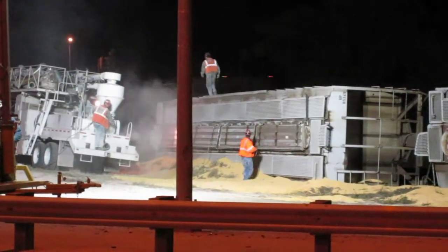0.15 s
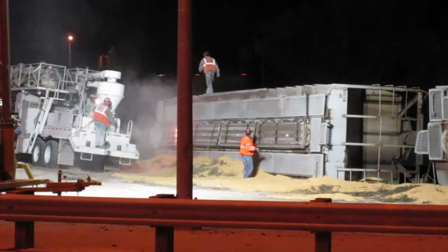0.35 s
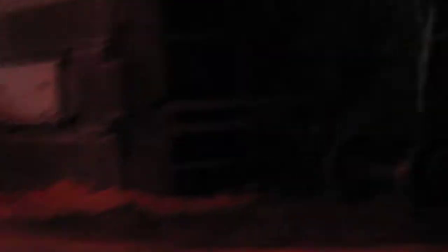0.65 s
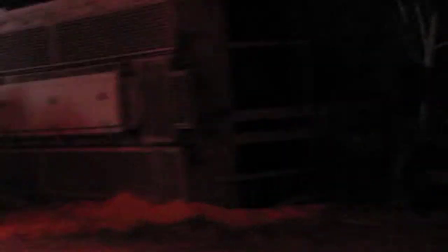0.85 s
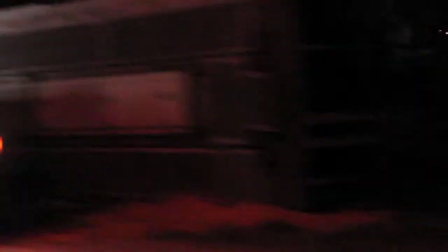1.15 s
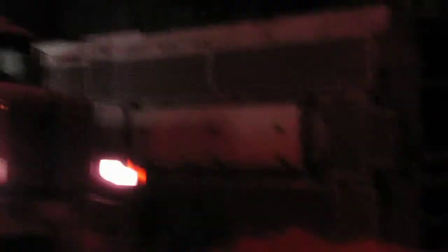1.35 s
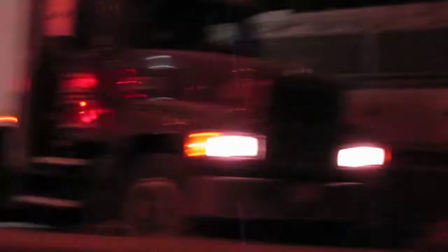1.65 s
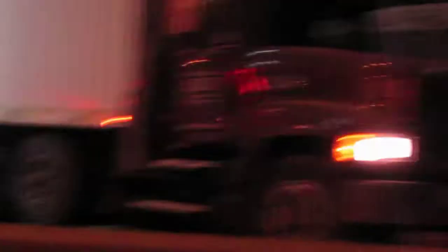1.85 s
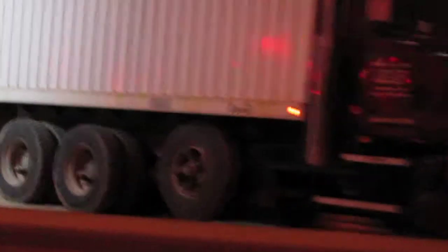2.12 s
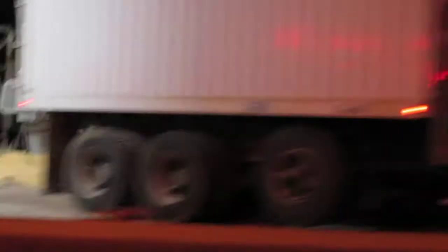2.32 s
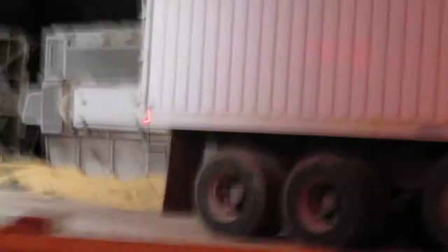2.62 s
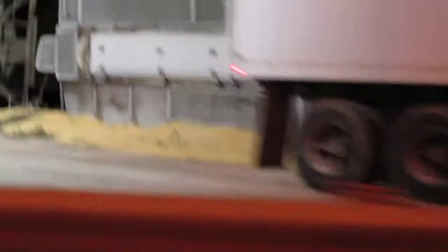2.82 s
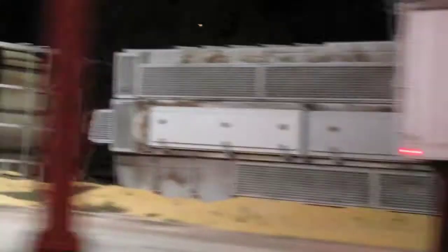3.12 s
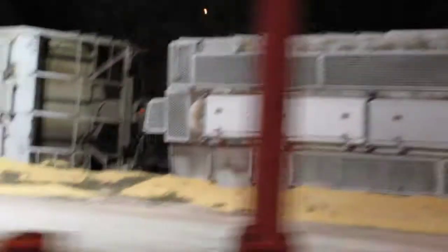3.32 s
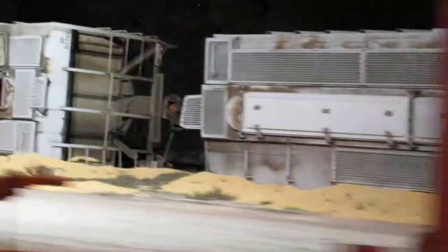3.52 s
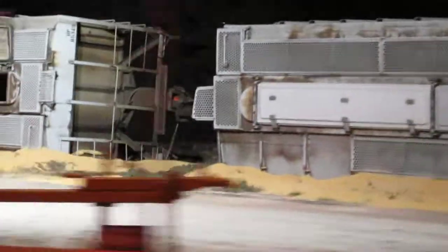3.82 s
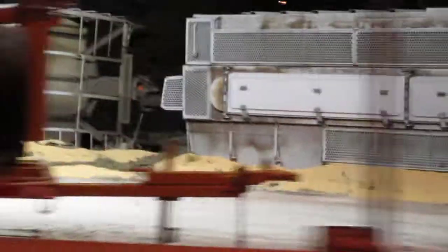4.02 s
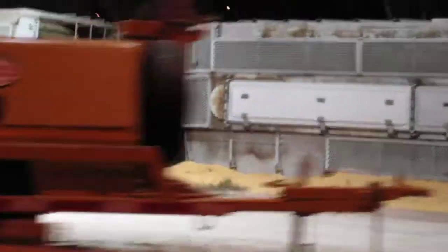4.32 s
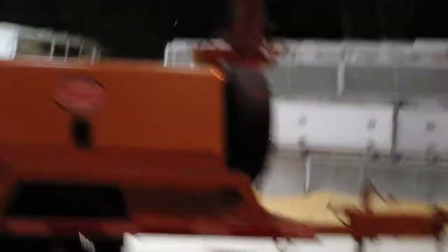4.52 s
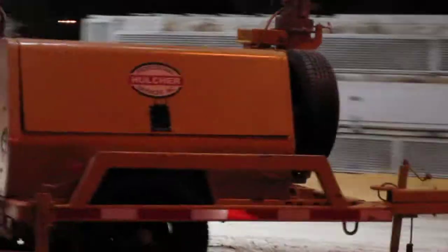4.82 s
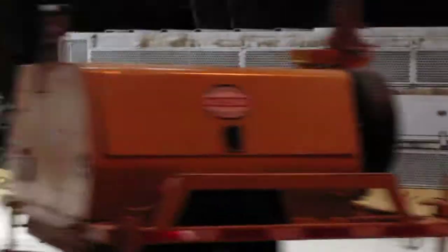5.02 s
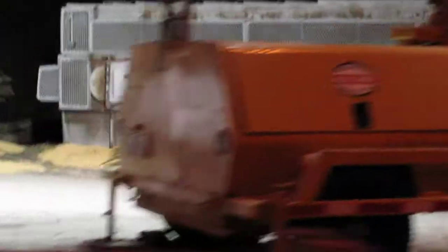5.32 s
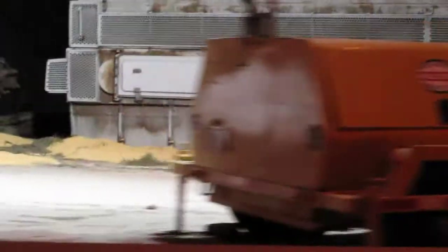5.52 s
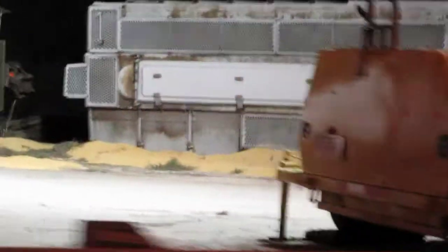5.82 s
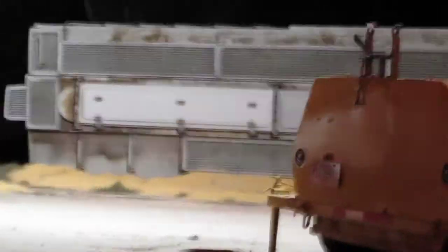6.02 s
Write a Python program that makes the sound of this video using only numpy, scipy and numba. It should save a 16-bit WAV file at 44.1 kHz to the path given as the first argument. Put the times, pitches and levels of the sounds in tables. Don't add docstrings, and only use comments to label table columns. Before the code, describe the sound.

Outdoors at night, a vacuum truck roars with bright rushing air and rapid diesel clatter. A short dead silence follows, then the sound resumes from inside a slowly rolling car: low cabin rumble, tiny grit ticks, two dull bumps and a swelling airy rush as a lorry passes. A very short air-valve blast spits, then a small diesel set rattles close, hard and metallic, with hiss pulsing to its beat.

```python
import sys
import numpy as np
from scipy import signal
from scipy.fft import rfft, irfft
from scipy.io import wavfile
from scipy.ndimage import uniform_filter1d, map_coordinates
from numba import njit

SR = 44100
rng = np.random.default_rng(int(sys.argv[2]) if len(sys.argv) > 2 else 0)


def int16_out(signal):
    q = np.round(np.clip(np.atleast_2d(signal).T, -1, 1) * 32767)
    wavfile.write(sys.argv[1], SR, q.astype(np.int16))


def boost_factor(decibels):
    exponent = np.asarray(decibels, float) / 20
    return 10 ** exponent


N = 271656
T = np.arange(N) / SR

CUT_S = (.3046, .4800)

# t/s, distance/m, block level/dB
DIESEL_PATH = [(.48, 18, -53), (1.5, 19.4, -49.5), (2.1, 16.3, -32), (2.5, 15.2, -26.5), (2.95, 12.65, -26),
               (3.4, 11.9, -21.5), (3.8, 10.8, -18), (4.05, 9.7, -17.5), (4.3, 10.76, -18.5),
               (5.2, 11, -19), (5.6, 11.4, -21), (6.16, 10.75, -22.5)]
# f/Hz, spectral level/dB per Hz
BLOCK_SPECTRUM = [(88, -32), (150, -2), (183, -52), (237, -19), (333, -8.5), (378, -13), (424, -9),
                  (510, -26.5), (596, -7.5), (839, -11), (914, 1.5), (996, -6), (1250, 1), (2620, -6.5),
                  (4500, -37), (5850, -81), (9900, -120)]
CYCLE_HZ, GEAR_TEETH = 14.78, 16
# place/cycle, block level/dB, cover level/dB, gas level/dB
STROKE = [(0, -8, -15, -5), (.06, 0, -2, 0), (.14, 1, 1, 0), (.25, -1.5, -4, 0), (.37, 0, -2, -1),
          (.5, -3, -8, -1.5), (.62, -3, -10, -.5), (.75, -5.5, -16, -2), (.86, -7, -18, -4),
          (.94, -9, -19, -6)]
# multiple of the cycle rate, level/dB
EXHAUST = [(1, -26), (2, -12), (3, -19), (4, 6), (5, -6), (6, -16), (7, 6), (8, -2.5), (9, 0), (10, -1.5),
           (11, -21), (12, -26), (13, -38.5), (14, -17), (15, 5.5), (16, -15), (17, 7.5), (18, -22.5)]
# multiple of the tooth rate, level/dB
GEAR_LINES = [(1, -6.5), (2, -4), (3, 0.5), (4, 5.5), (5, 0.5), (7, -3.5), (8, 0), (9, -1.5)]
# t/s, level/dB, rise/s, fall/s
SUMP = [(2.7, -26.5, 0.97, 0.42), (4.05, -24.5, 0.32, 0.34), (4.9, -28, 0.51, .3), (5.95, -29.5, 0.24, .6)]
COVER = [(.5, -39, .3, 0.98), (3.45, -25.5, 0.62, 0.53), (4.35, -33, 0.18, 0.12), (4.9, -29, .3, 0.36),
         (5.7, -35, .3, .5)]
GEAR_SWELLS = [(2, -28, .8, .6), (3.2, -28, 0.95, 0.66), (4.5, -27.5, 0.78, 1.3)]
# t/s, level/dB, rise/s, fall/s
ROCKER = (4.5, -36, 1, 1.1)
COVER_HZ, COVER_SAG_HZ_PER_S, ROCKER_HZ = 2713, 87, 3130

# f/Hz, spectral level/dB per Hz
RUSH_SPECTRUM = [(88, -15), (150, -7), (378, -9), (444, -6.5), (605, -5.5), (847, -3), (953, -3),
                 (1200, -4), (1520, -5), (2100, -7), (3040, -16.5), (3410, -13.5), (5000, -40.5),
                 (6500, -55), (11000, -120)]
AIR_DB, HOSE_HZ = -24.5, 996
# t/s, level/dB, rise/s, fall/s
LORRY = (1.5, -22.5, 1.13, 1.5)
# t/s, level/dB, rise/s, fall/s
HOSE = [(1.3, -21, 1.2, 1), (4.2, -27.5, 0.48, 0.69)]
WHINE = [(.9, -47, 0.18, .4), (3.0, -34, 1, 1.1), (4.6, -39.5, 0.34, 1.5)]
WHINE_HIGH_HZ, WHINE_LOW_HZ, WHINE_SAG_HZ_PER_S = 4400, 3382, 65
WHINE_DROPS_S, WHINE_DROP_LENGTH_S = 1.44, 0.27
# t/s, level/dB, rise/s, fall/s, f/Hz
HOLLOWS = [(1.9, -38.5, 0.65, 0.45, 3424), (2.5, -30.5, 0.47, 0.52, 2050), (3.2, -36.5, 0.58, 0.34, 3550),
           (5.8, -31, 0.3, .5, 1440)]

# f/Hz, spectral level/dB per Hz
STANDING_SPECTRUM = [(15, -62), (25, -13), (129, -15), (174, -9.5), (359, -14.5), (483, -19), (704, -6.5),
                     (897, -3.5), (1500, -10), (1960, -18), (2630, -18.5), (2860, -26), (4890, -32),
                     (11000, -35), (15600, -53)]
STANDING_DIESEL_DB, STANDING_AIR_DB = -24, -23

# t/s, level/dB
VALVE = [
    (2.53, -62),
    (2.538, -36),
    (2.562, -27),
    (2.566, -15),
    (2.5715, -16),
    (2.573, -70),
]
# f/Hz, spectral level/dB per Hz
VALVE_SPECTRUM = [(880, -32), (1500, -1.5), (2920, -2.5), (3450, -27), (3800, -11.5), (4230, -10),
                  (5250, -19.5), (6640, -12.5), (7330, -19), (8740, -10.5), (9730, -29), (12800, -29.5),
                  (15600, -38)]
# t/s, level/dB, rise/s, fall/s
SEEP = (2.4, -48.5, .6, .14)
SEEP_HZ = (7400, 10100)
# t/s, level/dB, rise/s, fall/s
LEAK = (5.6, -51, .7, .7)
LEAK_HZ, LEAK_CLIMB_HZ_PER_S = 7200, 620
# t/s, level/dB, rise/s, fall/s
NOZZLE = [(3.8, -52, 0.55, .3), (5.0, -51, .35, 1.1)]

BUMP_S = (1.178, 1.1965, 1.1995, 1.255, 1.672)
# level/dB, f/Hz, t60/s
BUMPS = [(-21, 70, 0.13), (-9.5, 127, 0.14), (-9, 208, 0.058), (-15, 105, 0.14), (-9.5, 48, 0.3)]
# t/s, level/dB, f/Hz, bandwidth/Hz, length/ms
TICKS = [(.685, -45, 5000, 3000, 10), (.77, -48.5, 9000, 8000, 5.5), (.846, -39, 6000, 6000, 5.4),
         (.853, -40, 10000, 2500, 3), (.944, -43, 8200, 1800, 2), (1.05, -39, 7200, 1500, 3),
         (1.165, -43, 7000, 7000, 8), (1.29, -41, 6000, 6000, 7.3), (1.843, -40, 6500, 5000, 3),
         (4.55, -42.5, 8000, 7000, 4.5), (4.92, -41, 7000, 6000, 5)]

# f/Hz, spectral level/dB per Hz
HISS_SPECTRUM = [(2350, -38), (4000, 0), (4630, -5.5), (5910, -3.5), (9000, -16), (11700, -38),
                 (19800, -120)]
TOP_SPECTRUM = [(4710, -19), (8000, -4.5), (8720, -3.5), (11300, -6), (14200, -16.5), (15600, -20)]
HISS_DB, TOP_DB, TOP_GROWS_DB_PER_S = -43.5, -54, 0.54
# t/s, share of the gain taken away/dB, rise/s, fall/s
TOP_LULL = (2.9, -10, .25, .35)
# t/s, extra delay/ms, echo share
GROUND = [(.48, 0.503, 0.27), (1.3, 0.466, 0.19), (1.7, 0.29, 0.16), (2.6, 0.237, 0.25), (2.8, 0.29, .02),
          (3.1, 0.36, 0.08), (4.2, 0.34, 0.29), (6.16, 0.31, 0.041)]

# f/Hz, spectral level/dB per Hz
RUMBLE_SPECTRUM = [(11, -36), (18, -10), (35, 0), (49, 1.5), (62, -3.5), (87, -10), (141, -9), (200, -24),
                   (260, -38), (440, -120)]
# t/s, level/dB
JOLTS = [(.9, -28), (1.2, -29), (1.33, -29), (1.7, -21.5), (2.21, -33), (2.72, -26), (3.13, -29.5),
         (3.88, -43), (4.03, -36), (4.2, -34), (4.55, -36), (5.0, -34), (5.24, -38), (6.05, -33)]
RUMBLE_DB, RUMBLE_EASE_DB_PER_S = -29, 0.63
JOLT_RISE_S, JOLT_FALL_S = 0.066, 0.049
# f/Hz, rms level/dB
MOTOR_LINES = [(6115, -76), (6148, -77), (15735, -79.5)]


def diesel(turns, block_db):
    cover_hz = COVER_HZ - COVER_SAG_HZ_PER_S * (T - COVER[1][0]) + 35 * walk(5)
    block = clatter(turns, .8) * knocking(turns, column=1, depth=1.1)
    block = steady(colour(block, BLOCK_SPECTRUM, .6, rate=3), .14)
    sump = clatter(turns, .6) * knocking(turns, column=1, depth=1.1)
    sump = steady(ring(sump, 1200, 140), .14)
    cover = clatter(turns, .6) * knocking(turns, column=2, depth=1.0)
    cover = steady(ring(cover, cover_hz, 240), .2)
    rocker = clatter(turns, .78) * knocking(turns, column=2, depth=1.0)
    rocker = steady(ring(rocker, ROCKER_HZ, 390), .33)
    hum = sum(boost_factor(db) * np.sin(2 * np.pi * (k * turns + rng.random())) for k, db in EXHAUST)
    sound = boost_factor(block_db) * (block + boost_factor(-18.5) * unit(hum))
    sound = sound + swells(SUMP) * sump
    sound = sound + swells(COVER) * boost_factor(1.1 * walk(10)) * cover
    sound = sound + swell(*ROCKER) * rocker
    return sound + swells(GEAR_SWELLS) * gear_mesh(turns)


def gear_mesh(turns):
    lines = 0
    for k, db in GEAR_LINES:
        phase = k * GEAR_TEETH * turns + .05 * walk(20)
        lines = lines + boost_factor(db + 2.2 * walk(12)) * np.sin(2 * np.pi * phase)
    return unit(lines)


def passing_turns(metres):
    return 1.12 + CYCLE_HZ * (T - metres / 343)


def gas_pulses(turns, block_db):
    share = np.clip(boost_factor(block_db + 24), 0, 1)
    gas = knocking(turns, column=3, depth=.8)
    slap = knocking(turns - .03, column=1, depth=.7)
    puffs = np.sqrt(1 - share ** 2 + (share * gas) ** 2)
    taps = np.sqrt(1 - share ** 2 + (share * slap) ** 2)
    return puffs, taps


def knocking(turns, column, depth):
    table = np.transpose(STROKE)
    size = rng.standard_normal(int(3 * turns.max()) + 2)
    db = np.interp(turns % 1, table[0], table[column], period=1)
    db = db + .8 * np.interp(3 * turns, np.arange(len(size)), size)
    return unit(boost_factor(depth * db))


def clatter(turns, memory):
    size, memory = int(SR / CYCLE_HZ), np.clip(memory, 0, .97)
    fresh = rng.standard_normal((int(turns.max()) + 12, size))
    pattern = signal.lfilter([1], [1, -memory], fresh, axis=0)[10:].ravel()
    return map_coordinates(pattern, [turns * size], order=3)


def suction():
    rush = np.hypot(boost_factor(AIR_DB), swell(*LORRY)) * colour(noise(), RUSH_SPECTRUM, .37, rate=7)
    hose = ring(noise(), HOSE_HZ * (1 + .03 * walk(9)), 270) * boost_factor(1.0 * walk(30))
    drop = .5 + .5 * np.tanh((T - WHINE_DROPS_S) / WHINE_DROP_LENGTH_S)
    whine_hz = WHINE_HIGH_HZ - (WHINE_HIGH_HZ - WHINE_LOW_HZ) * drop
    whine_hz = whine_hz - WHINE_SAG_HZ_PER_S * np.clip(T - WHINE_DROPS_S - 1, 0, None)
    whine = ring(noise(), whine_hz * (1 + .018 * walk(4)), 230)
    hollows = sum(swell(*row) * ring(noise(), hz, 250) for *row, hz in HOLLOWS)
    return rush + swells(HOSE) * hose + swells(WHINE) * whine + hollows


def standing():
    turns = 1.14 + CYCLE_HZ * T
    knocks = clatter(turns, .82) * knocking(turns, column=1, depth=.43)
    knocks = colour(knocks, STANDING_SPECTRUM[:13])
    cover = ring(clatter(turns, .7) * knocking(turns, column=2, depth=1.1), 2800, 800)
    rush = with_ground(colour(noise(), STANDING_SPECTRUM, 1.6, rate=9.9), .47, .12)
    whistle_db = -54 + 12 * np.exp(-((T - .125) / .02) ** 2) + 8 * np.exp(-((T - .2) / .04) ** 2)
    whistle = boost_factor(whistle_db) * ring(noise(), 4950, 160)
    return boost_factor(STANDING_DIESEL_DB) * knocks + boost_factor(-36.0) * cover + boost_factor(STANDING_AIR_DB) * rush + whistle


def air_valve():
    return boost_factor(np.interp(T, *np.transpose(VALVE), -120, -120)) * colour(noise(), VALVE_SPECTRUM)


def jets(puffs):
    leak_hz = LEAK_HZ + LEAK_CLIMB_HZ_PER_S * (T - LEAK[0])
    leak = swell(*LEAK) * ring(noise(), leak_hz, 900)
    nozzle = puffs * swells(NOZZLE) * boost_factor(2.5 * walk(30)) * ring(noise(), 5950, 400)
    seep = ring(noise(), SEEP_HZ[0], 1800) + boost_factor(-12.5) * ring(noise(), SEEP_HZ[1], 1800)
    return puffs * (leak + nozzle) + swell(*SEEP) * seep


def bumps():
    out = 0
    for s, (db, hz, t60) in zip(BUMP_S, BUMPS):
        after = np.clip(T - s, 0, None)
        envelope = np.exp(-np.log(1000) * after / t60) * (1 - np.exp(-after * hz * 2))
        out = out + boost_factor(db) * np.sin(2 * np.pi * hz * after) * envelope
    return out


def grit_ticks():
    out, grit = 0, noise()
    for s, db, hz, width, ms in TICKS:
        out = out + boost_factor(db) * ring(grit, hz, width) * np.exp(-((T - s) * 1000 / ms - 1) ** 2)
    return out


def hiss(puffs, taps):
    ms, share = curves(GROUND)
    body = boost_factor(HISS_DB) * puffs * colour(noise(), HISS_SPECTRUM, .41, rate=4.5)
    top_gain = boost_factor(TOP_DB + TOP_GROWS_DB_PER_S * T) * (1 - swell(*TOP_LULL))
    top = top_gain * taps * colour(noise(), TOP_SPECTRUM, .58, rate=3.87)
    return with_ground(body + top, ms, share)


def rumble():
    jolts = swells([(s, db, JOLT_RISE_S, JOLT_FALL_S) for s, db in JOLTS])
    level = np.hypot(boost_factor(RUMBLE_DB - RUMBLE_EASE_DB_PER_S * T), jolts)
    return level * colour(noise(), RUMBLE_SPECTRUM, 1.2, rate=9)


def motor_whistles():
    return sum(boost_factor(db) * np.sin(2 * np.pi * hz * T) for hz, db in MOTOR_LINES)


def with_ground(x, ms, share):
    echo = map_coordinates(x, [np.arange(N) - ms * SR / 1000], order=3)
    return (x + share * echo) / np.sqrt(1 + share ** 2)


def colour(x, points, flicker_db=0, rate=10):
    hz, db = np.transpose(points)
    octave = np.log2(np.arange(1, N // 2 + 2) * SR / N)
    spectrum = rfft(x) * boost_factor(np.interp(octave, np.log2(hz), db, -120, -120))
    if not flicker_db:
        return unit(irfft(spectrum, N))
    out = 0
    for centre in np.arange(np.log2(hz[0]), np.log2(hz[-1]) + .5, .5):
        band = irfft(spectrum * np.clip(1 - 2 * abs(octave - centre), 0, 1), N)
        out = out + boost_factor(flicker_db * walk(rate)) * band
    return unit(out)


@njit
def svf(x, hz, width):
    y, b, l = np.empty(len(x)), 0., 0.
    for i in range(len(x)):
        g, k = np.tan(np.pi * hz[i] / SR), width / hz[i]
        v = (b + g * (x[i] - l)) / (1 + g * (g + k))
        b, l, y[i] = 2 * v - b, l + 2 * g * v, k * v
    return y


def ring(x, hz, width):
    centre, width = hz + 0 * T, 1. * width
    return unit(svf(svf(x, centre, width), centre, width))


def steady(x, seconds):
    return x / np.sqrt(uniform_filter1d(x ** 2, int(seconds * SR)) + 1e-6)


def swell(s, db, rise, fall):
    return boost_factor(db) * np.exp(-((T - s) / np.where(T < s, rise, fall)) ** 2)


def swells(table):
    return np.sqrt(sum(swell(*row) ** 2 for row in table))


def walk(rate):
    k = int(SR / rate)
    held = np.repeat(rng.standard_normal(N // k + 1), k)
    return uniform_filter1d(uniform_filter1d(held, k), k)[:N]


def curves(table):
    s, *columns = np.transpose(table)
    return [np.interp(T, s, c) for c in columns]


def noise():
    return rng.standard_normal(N)


def unit(x):
    return x / np.sqrt(np.mean(x ** 2))


def scene():
    metres, block_db = curves(DIESEL_PATH)
    turns = passing_turns(metres)
    puffs, taps = gas_pulses(turns, block_db)
    rolling = diesel(turns, block_db) + suction()
    rolling = rolling + air_valve() + jets(puffs) + bumps() + grit_ticks()
    rolling = rolling + hiss(puffs, taps) + rumble() + motor_whistles()
    fade = .0015
    standing_gain = np.clip((CUT_S[0] - T) / fade, 0, 1)
    rolling_gain = np.clip(np.minimum(T - CUT_S[1], T[-1] - T) / fade, 0, 1)
    return (standing() * standing_gain + rolling * rolling_gain)[None]


def roll_off(x):
    return signal.sosfilt(signal.butter(12, 15720, fs=SR, output="sos"), x)


def record(dry):
    mix = np.tanh(1.29 * dry) / 1.289
    return roll_off(mix)


dry = scene()
out = record(dry)
int16_out(out)
```